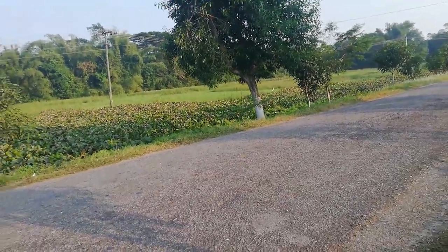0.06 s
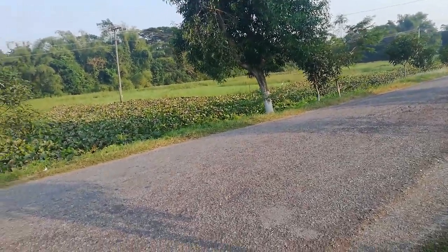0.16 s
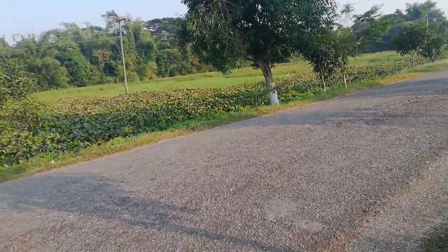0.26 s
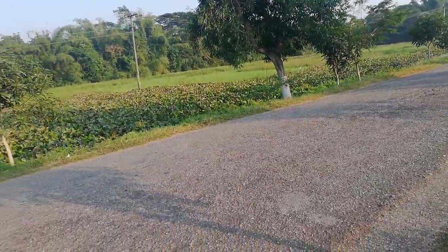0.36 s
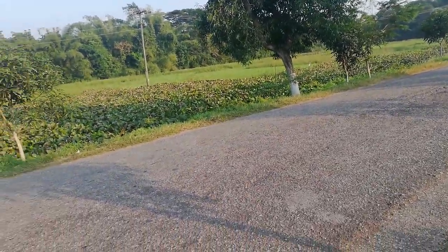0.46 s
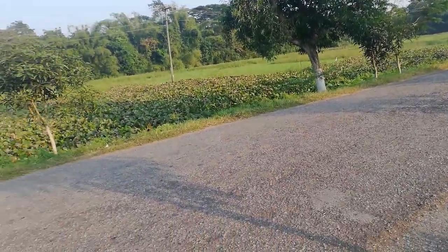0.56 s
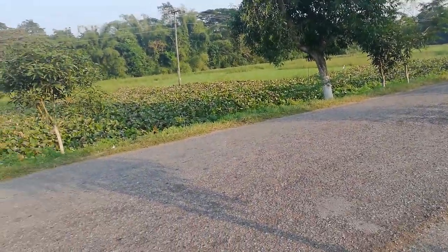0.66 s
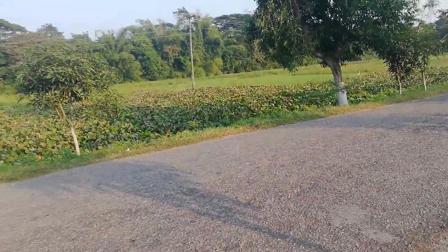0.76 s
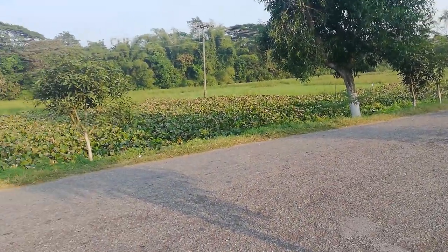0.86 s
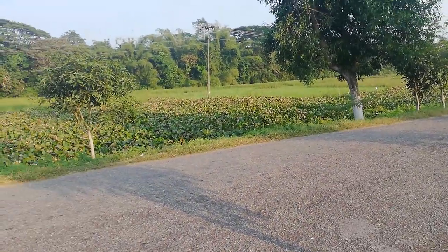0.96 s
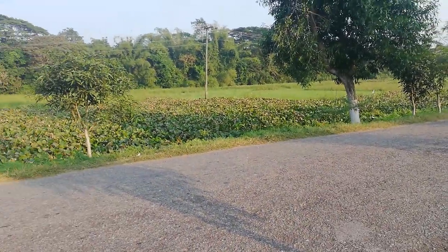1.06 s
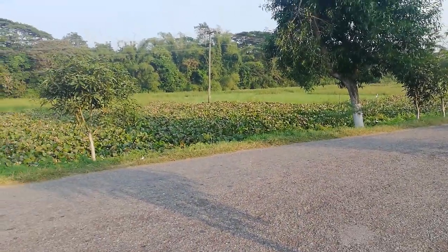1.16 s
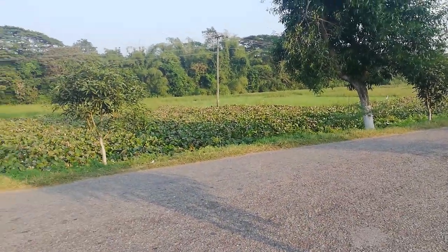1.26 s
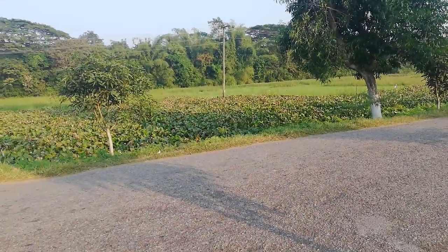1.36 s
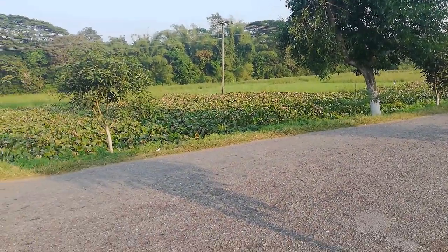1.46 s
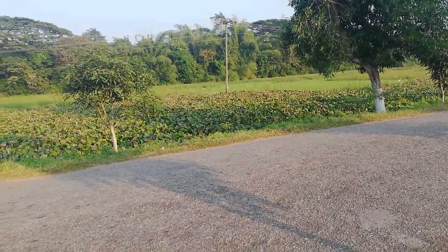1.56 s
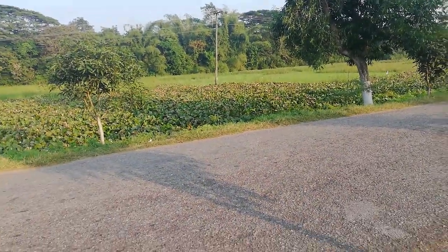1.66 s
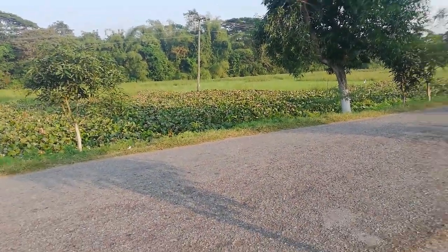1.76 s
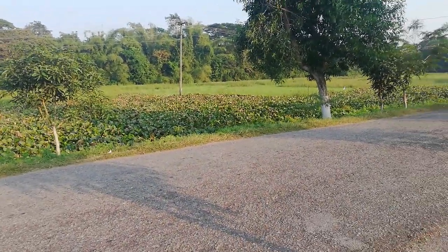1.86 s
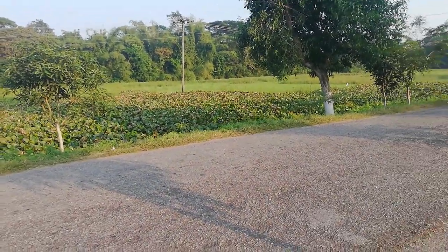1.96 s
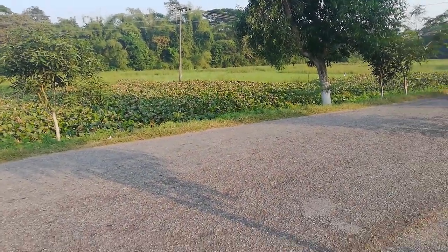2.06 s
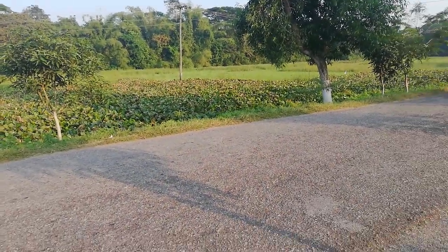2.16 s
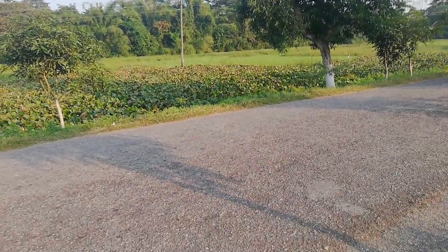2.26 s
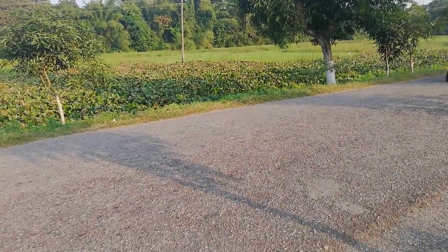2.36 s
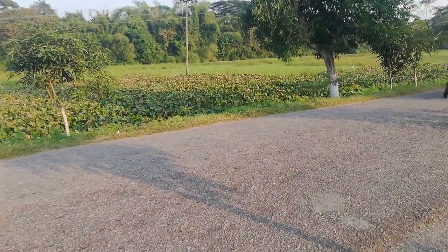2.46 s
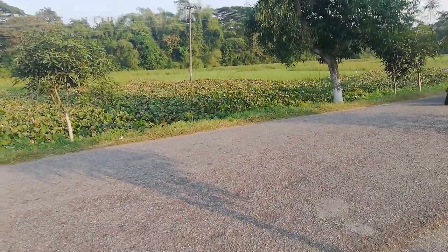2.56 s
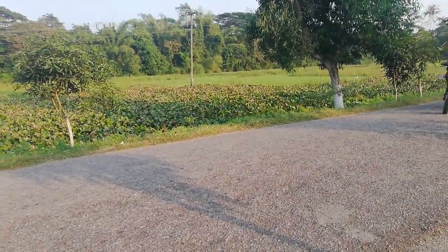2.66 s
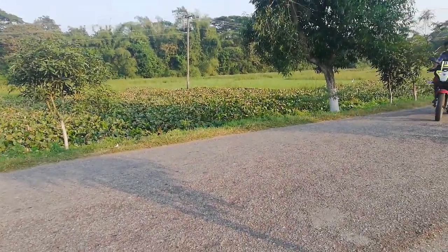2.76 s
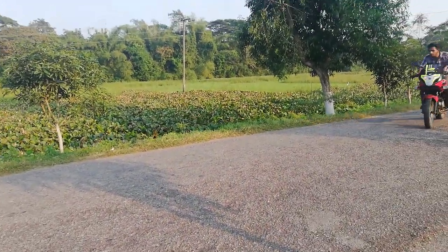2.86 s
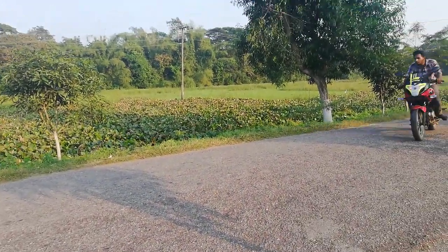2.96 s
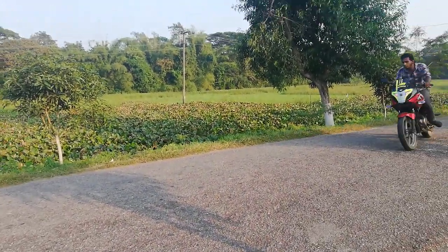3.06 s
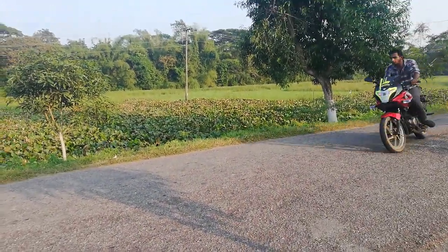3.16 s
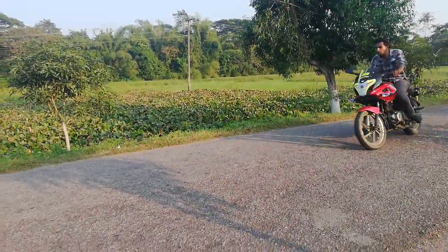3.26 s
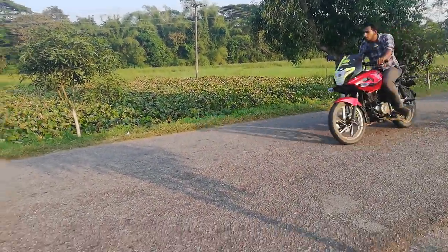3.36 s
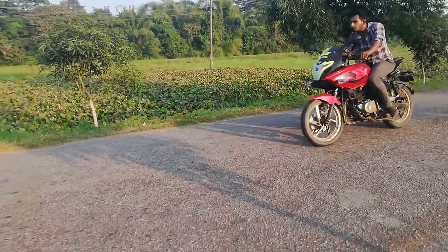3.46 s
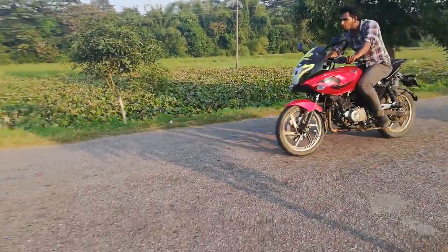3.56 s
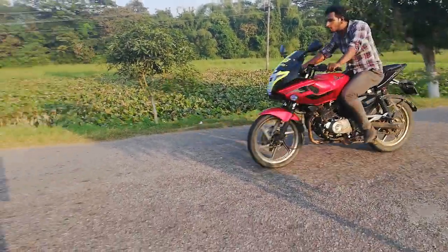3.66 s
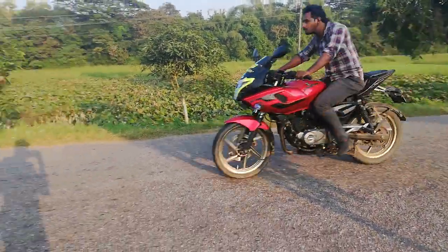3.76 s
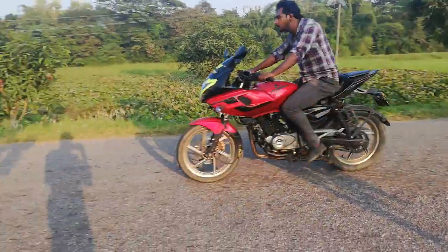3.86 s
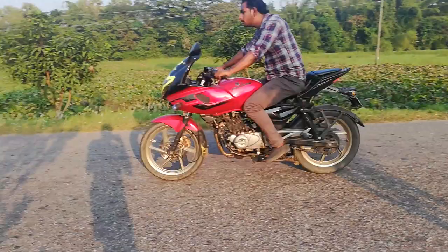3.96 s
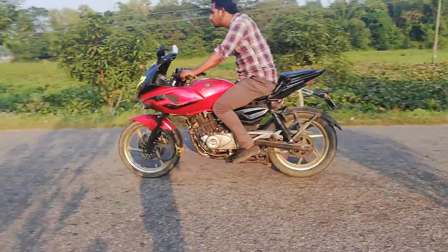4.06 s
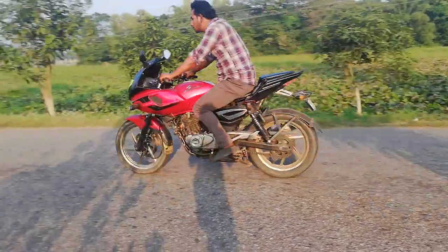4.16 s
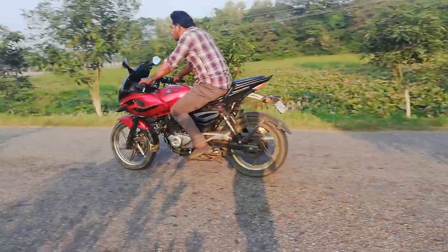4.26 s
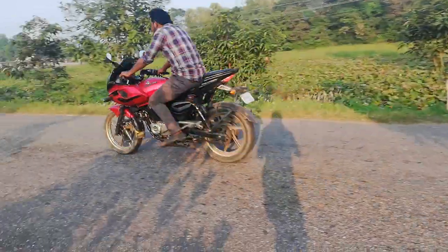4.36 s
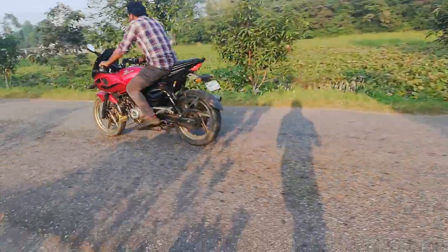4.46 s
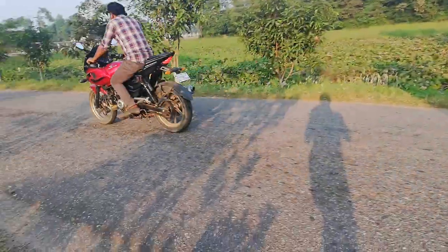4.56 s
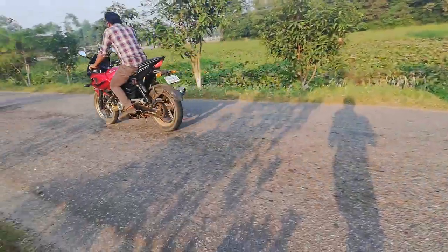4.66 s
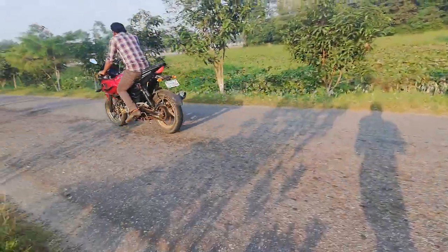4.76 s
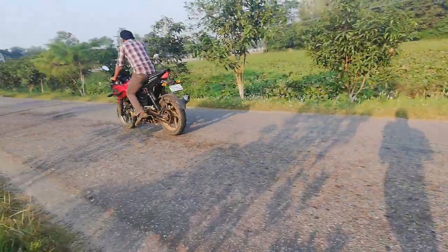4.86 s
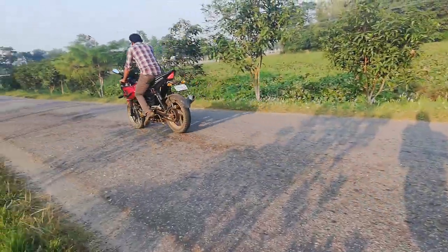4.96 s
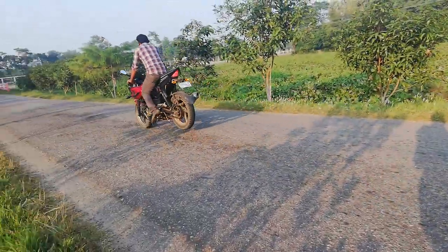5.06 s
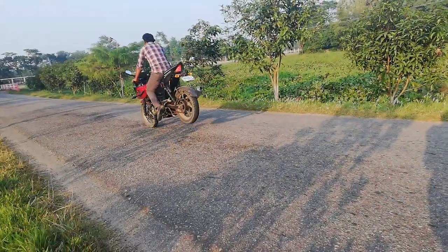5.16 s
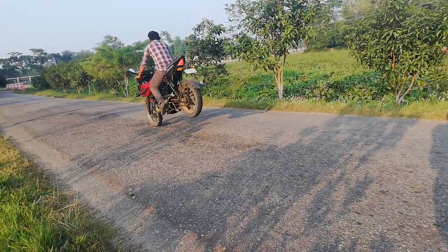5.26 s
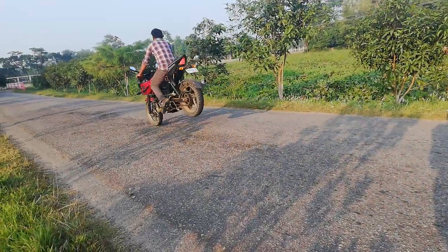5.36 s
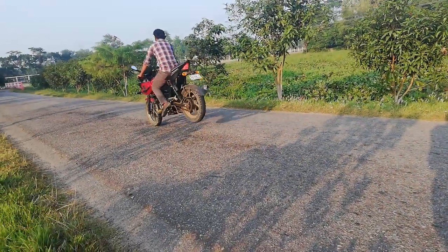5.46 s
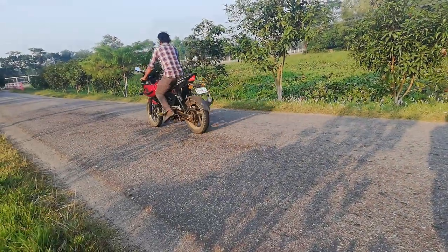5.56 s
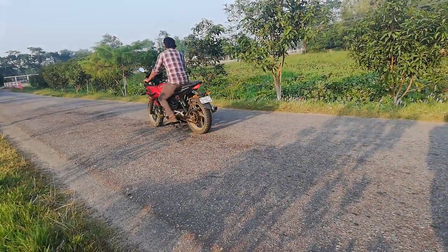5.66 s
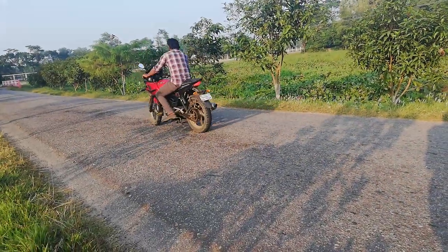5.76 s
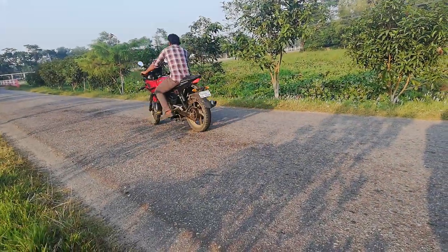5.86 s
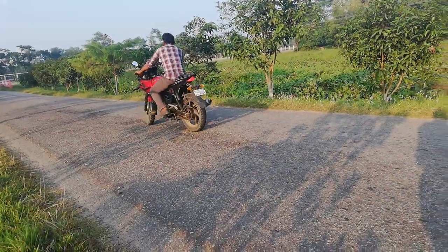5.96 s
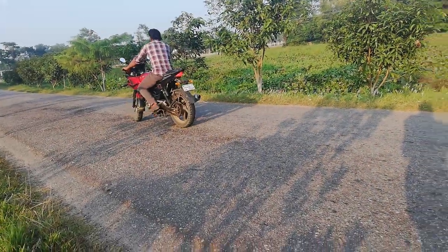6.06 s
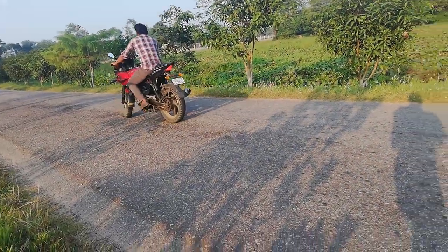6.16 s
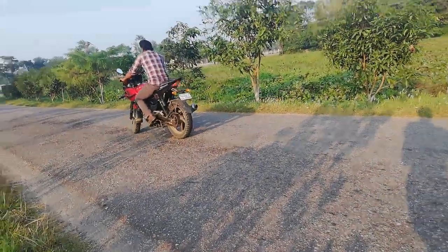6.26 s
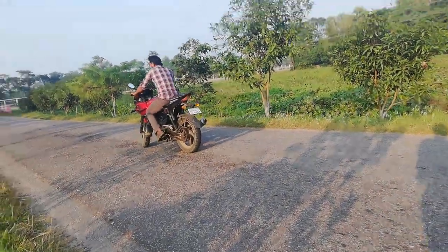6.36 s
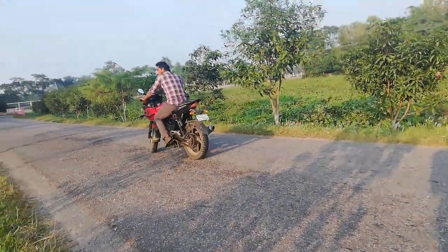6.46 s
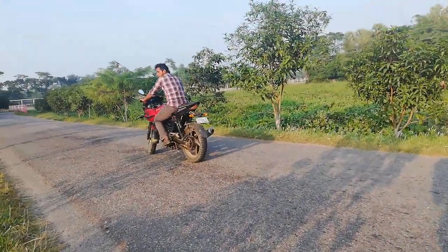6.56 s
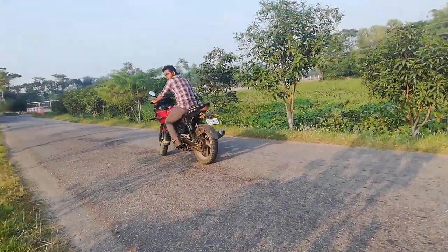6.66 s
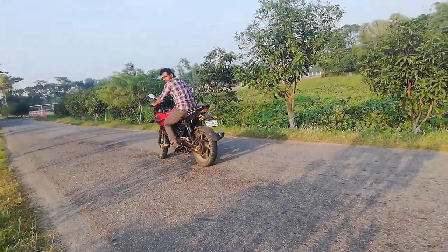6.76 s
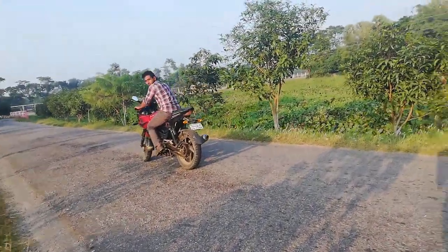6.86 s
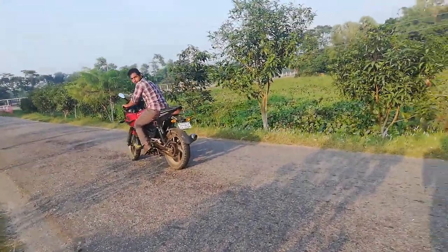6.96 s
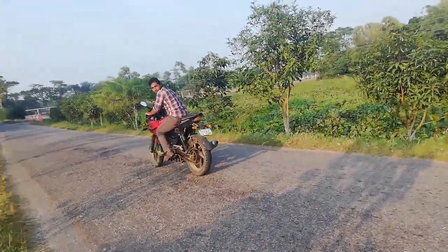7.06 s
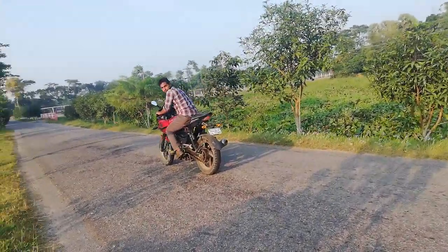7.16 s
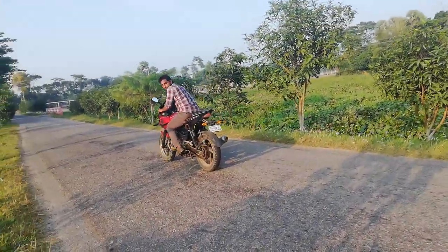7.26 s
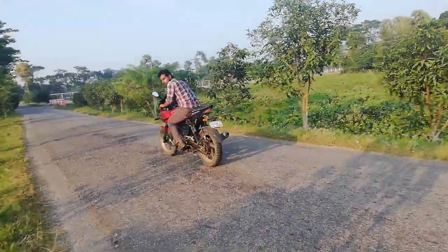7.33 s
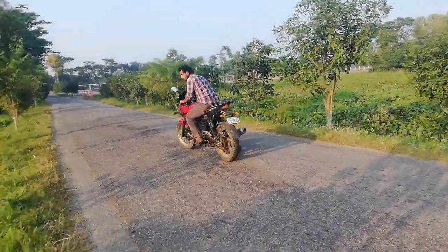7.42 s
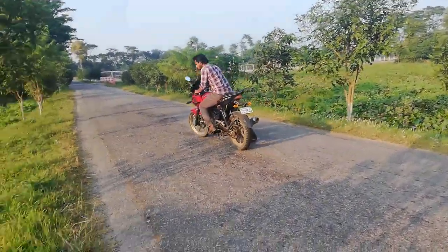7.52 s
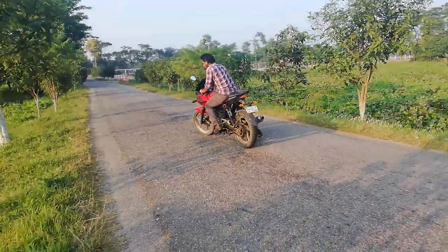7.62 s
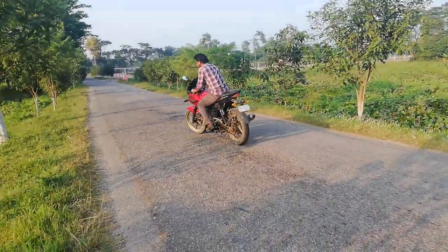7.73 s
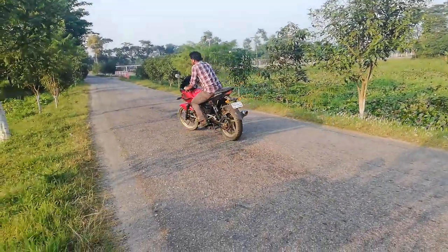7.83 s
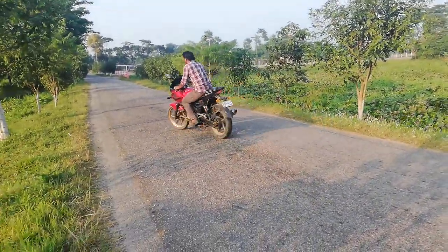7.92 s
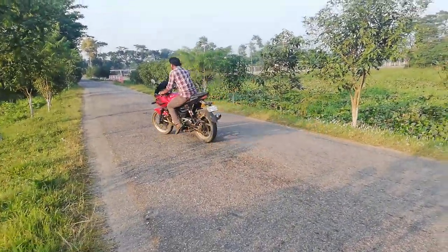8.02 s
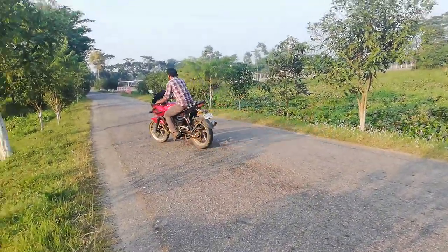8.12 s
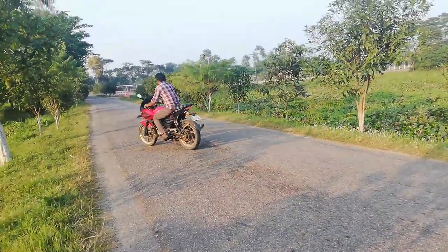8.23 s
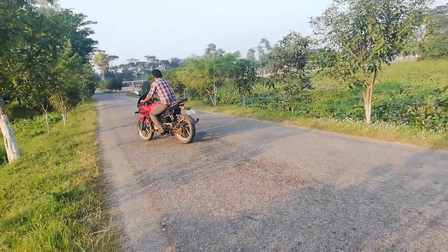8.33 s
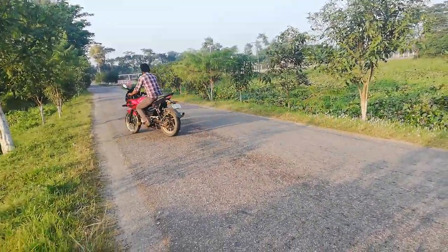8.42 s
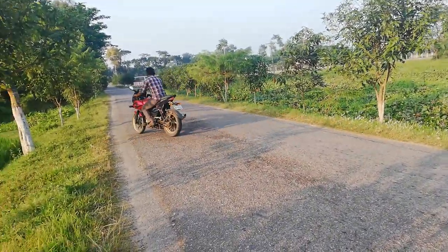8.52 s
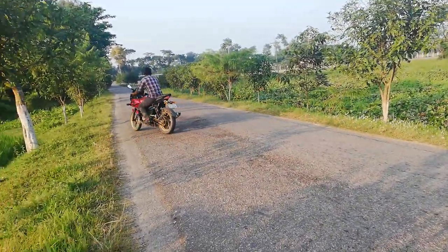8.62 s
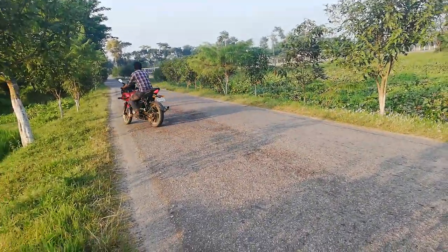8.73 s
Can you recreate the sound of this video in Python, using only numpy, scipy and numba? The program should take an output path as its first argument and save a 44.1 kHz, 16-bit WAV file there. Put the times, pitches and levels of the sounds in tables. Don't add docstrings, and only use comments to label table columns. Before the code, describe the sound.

Open country air, with low soft wind and a faint single-cylinder motorbike puttering at a distance; light ticks and a faint brush come early, a firmer tick at 0.7 s. Around 1.2-1.7 s the engine revs up briefly, with gear whine, then drops back. From 2.8 s it swells again, peaking near 3.5 s as it passes with throaty bark, metallic rattle and bright hiss. The throttle closes and the beat slows through 4-5 s into a sparse, stumbling idle until 6.5 s, some firings almost missing. Grit scuffs and pebble snaps dot this, heaviest around 5.7 s, with thin high insects behind. At 6.6 s it pulls off unevenly; a loud sharp tick hits near the left microphone at 7.04 s and a pebble snaps at 7.36 s. Harder, drier barks surge from 7.3 to 8.2 s, then the engine slows and recedes to 8.8 s.

```python
import sys
import numpy as np
from scipy import signal
from scipy.fft import rfft, irfft, next_fast_len
from scipy.io import wavfile
from scipy.ndimage import uniform_filter1d, map_coordinates
from numba import njit

SR = 44100
rng = np.random.default_rng(int(sys.argv[2]) if len(sys.argv) > 2 else 0)


def persist_wave(psi):
    counts = np.round(np.clip(psi, -1, 1) * 32767).astype(np.int16)
    wavfile.write(sys.argv[1], SR, np.atleast_2d(counts).T)


def ratio_of_db(decibels):
    return 10 ** (np.asarray(decibels, float) / 20)


N = 387638

# time in seconds, firings a second in Hz.
FIRING_RATE = [(0.0, 16.75), (0.907, 20.38), (1.625, 33.24), (2.089, 23.08), (2.467, 26.62), (2.963, 27.36),
               (3.43, 33.4), (4.081, 19.16), (4.827, 8.2), (5.814, 6.79), (6.529, 7.78), (6.644, 15.27),
               (6.928, 13.86), (7.22, 25.41), (7.727, 23.54), (7.95, 19.21), (8.24, 25.5), (8.79, 14.54)]
# time in seconds, open-throttle bark in dB, thump over bark in dB,
# airbox boom over bark in dB.
EFFORT = [(0, -52, 4, -27), (.55, -51, -13.5, -25), (0.948, -52, -20, -2), (1.25, -44.5, -6, 5),
          (1.6, -38.5, -7.5, -0.5), (2.0, -51.5, -8, -21), (2.8, -44, -10, -7), (2.95, -40, -5, 2),
          (3.498, -32.5, -12.5, -1.5), (3.8, -35, -11, -13), (4.2, -36, -13.5, -9), (4.5, -41, -17, -6),
          (5.1, -50.5, -8, -16), (6.4, -44.5, -18, -24), (6.62, -38, -2, -9), (6.85, -41.5, 2, -1),
          (7.0, -39, -3.5, -20), (7.3, -40.5, -9, -20), (7.57, -31, -23, -5), (7.8, -31.5, -17, -7),
          (8.15, -34, -8.5, -9), (8.79, -45, -10, -11)]
# start in seconds, end in seconds.
SHUT = [
    (.37, 0.5),
    (1.671, 1.84),
    (3.569, 6.55),
    (8.228, 18),
]
# time in seconds, change of bark in dB.
STUMBLES = [
    (4.88, -6),
    (4.99, 6.5),
    (5.27, -24),
    (5.4, -1),
    (5.53, -32),
    (5.67, -1),
    (6.11, -2),
    (6.51, -3),
    (6.76, -3.5),
    (6.88, -6),
]
# frequency in Hz, width in Hz, level in dB.
PIPE = [(310, 32, 6), (216.5, 8.9, 3)]
# frequency in Hz, width in Hz, level in dB.
SILENCER = [(80.5, 18.5, 0), (66.5, 34, 0)]
# frequency in Hz, width in Hz, level in dB.
AIRBOX = [(105.7, 35, 0)]
# delay in seconds, share.
PIPE_ECHOES = [(0, 0.52), (.0067, 0.087), (.0116, .19)]
# delay in seconds, share.
INTAKE_ECHOES = [(0, 0.82), (.009, 0.57)]
ORDERS = [(2, .72, 0.4, 0.53, 2.3), (3, -0.77, -0.79, -.8, -1.5), (4, 0.72, 1, .82, 0.16),
          (5, -0.26, 0.12, -0.27, 0.78), (6, 0.066, .6, 0.076, 0.18), (7, 0.051, 0.2, 0.15, 0.031),
          (8, 0.013, 0.62, -0.28, -0.14), (9, 0.33, 0.032, 0.48, 0.39), (10, 0.32, -0.33, 0.55, -0.56),
          (11, 0.41, -0.054, 0.93, -0.025), (12, -0.053, .8, 1, 0.5), (13, 0.19, 0.69, .9, -.2)]
STAGES = [1.8, 2.0, 2.8, 3.1, 4.5, 5.1]
# time in seconds, rattle in dB, gear whine over rattle in dB.
WORKS = [(0, -50, 8), (1.15, -47.5, 6), (1.74, -43, -6.5), (2.13, -43.5, -0.5), (2.89, -41, -2.5),
         (3.13, -39, 4), (3.5, -31.5, -3), (3.87, -35.5, 3.5), (4.43, -39.5, -8), (5.14, -49, -15),
         (6.29, -48, -33), (6.7, -43, -46), (7.02, -42, -10), (7.3, -36, -10), (7.56, -37.5, -4.5),
         (8.03, -42, -1), (8.2, -39.5, -9), (8.79, -47.5, -39)]
# frequency in Hz, density in dB per Hz.
RATTLE = [(130, -55), (220, -1.5), (380, -4), (505, -17), (615, -44), (694, -11.5), (845, -4.5), (932, 1),
          (1760, -6), (2240, -4), (2700, -1), (3540, -2.5), (4760, -20), (5200, -131), (6760, -37),
          (11400, -120)]
# frequency in Hz, density in dB per Hz.
HISS = [(2710, -5), (4200, -2), (4800, -5.5), (5400, -2.5), (6000, -1.5), (6630, 2), (7320, -1.5),
        (8690, -0.5), (9950, -7), (11600, -10.5), (12600, -19), (15200, -18), (16000, -40)]
# teeth per firing, width in the same unit, level in dB.
GEARS = [(75.3, 6.8, 0)]
# teeth per firing, width in the same unit, level in dB.
CHAIN = [(114, 4.4, -0.098), (172, 17, -0.9)]
# start in seconds, end in seconds, first frequency in Hz, last frequency in Hz, level over rattle in dB.
SHEEN = [(-.2, .55, 1170, 1400, 5), (-.1, .92, 2000, 2180, 2), (.9, 1.2, 2550, 2720, -2),
         (.9, 1.28, 4650, 5050, 1), (1.15, 1.6, 5250, 5650, -7), (1.4, 1.7, 1050, 1120, 3),
         (5.9, 6.05, 5100, 4950, -4), (1.42, 1.7, 520, 570, -9), (7.4, 8.3, 800, 740, -8),
         (7.0, 7.55, 3650, 3550, -12), (7.05, 7.4, 4500, 4350, -13), (7.95, 8.25, 3350, 3600, -11),
         (6.4, 7.2, 2200, 2250, -9), (8.02, 8.32, 1820, 1950, -3), (1.46, 1.78, 3600, 3950, -1),
         (3.3, 3.8, 1500, 2050, -1), (3.1, 4.0, 1150, 1280, -4), (1.95, 2.9, 2750, 2950, -5),
         (1.75, 2.9, 4400, 4350, -6), (3.05, 3.6, 3250, 3500, -5), (3.62, 4.15, 2000, 1400, -4),
         (3.95, 4.9, 1250, 1080, -6), (3.3, 3.65, 3550, 3800, -3), (3.6, 4.05, 3100, 2400, -6),
         (4.0, 4.4, 2150, 1850, -6), (4.0, 4.45, 3050, 3150, -9), (6.6, 7.1, 3100, 3250, -12),
         (3.28, 3.68, 2650, 2900, -4), (1.58, 2.05, 5050, 4400, -3), (1.42, 1.8, 2530, 2600, 0),
         (2.7, 3.3, 1100, 1200, -6), (8.2, 8.8, 2550, 2450, -5), (7.15, 7.7, 1950, 1800, -5),
         (7.1, 7.45, 900, 980, -5), (7.1, 7.6, 6400, 6450, -8), (1.38, 1.6, 4450, 4350, -9),
         (2.2, 2.5, 5500, 5600, -9), (6.4, 6.9, 5400, 5600, -11)]
# time in seconds, share of the centre frequency.
SHEEN_WIDTH = [(3.0, .065), (3.5, .095), (4.3, .075), (6, .065)]
# frequency in Hz, width in Hz, level in dB.
SPIT = [(2450, 200, 5), (3200, 270, -9), (6200, 540, 6), (11800, 1200, -6)]
# time in seconds, frequency in Hz,
# depth from 0 to 1.
DIP = [(0, 4320, 0), (.6, 4540, 0.2), (1.001, 5670, 0.5), (1.25, 6000, 0.3), (1.6, 5900, .3),
       (1.951, 5100, 0.65), (2.6, 5000, 0.37), (3.6, 5200, 0.2), (4.6, 5000, 0.54), (5.2, 5450, 0.8),
       (6.2, 5340, 0.8), (6.55, 4700, 0.2), (7.0, 4940, 0), (7.3, 5240, 0.2), (7.8, 5340, 0.84),
       (8.79, 5200, 0.01)]
# time in seconds, frequency in Hz, depth from 0 to 1.
LOW_DIP = [(0, 3000, .4), (.7, 3100, 0.7), (1.3, 3300, 0.8), (2.0, 3450, 0.9), (2.8, 3400, 0.6),
           (2.95, 2600, .5), (3.55, 2240, 0.36), (3.85, 2330, 0.4), (4.1, 2520, 0.2), (4.3, 3700, 0.5),
           (4.6, 3770, 0.34), (6.4, 2800, 0), (7.2, 2786, 0), (7.7, 2140, 0), (8.79, 3020, 0)]
# frequency in Hz, density in dB per Hz.
FIELD = [(15, -37), (25, -5), (97, 2.5), (157, -5.5), (317, -10), (591, -26), (754, -4.5), (1840, -44),
         (2220, -9), (5430, -58), (6560, -11), (9570, -20.5), (10400, -17), (12200, -50), (16000, -49)]
# frequency in Hz, width in Hz, level in dB, start in seconds, end in seconds, trill depth.
INSECTS = [
    (6340, 77, -62, 3.2, 10, .1),
    (10290, 45, -57, 4.3, 6.3, 1.1),
]
# time in seconds, peak
# in dB, treble over peak in dB, knock over peak in dB.
SCUFFS = [(4.2512, -45.5, 10, -20), (4.36, -48, 8, -20), (4.398, -26.5, -13, -20), (4.479, -51, 10, -20),
          (4.648, -51, 10, -20), (4.733, -47, 6, -20), (4.774, -53, 8, -20), (4.852, -52, 9, -20),
          (4.904, -53, 8, -20), (4.97, -38, 1, -18), (4.991, -34, -3.5, -11), (5.004, -34.5, -7, -9),
          (5.047, -56, 7, -10), (5.069, -56, -1, -10), (5.335, -31, -20, -19), (5.643, -31.5, -37, 12.5),
          (5.654, -32, -6, -8), (5.672, -22, -10.5, -1), (5.686, -23.5, -10.5, -1), (5.697, -29, -17, 2),
          (5.715, -35, -17, 8), (5.7304, -18, -14.5, -23), (5.745, -26, -12, -15), (5.7736, -24.5, -15, -6),
          (5.788, -31, -11, -3), (5.828, -40, -23, 7), (5.921, -50.5, 4.5, -20), (5.959, -39, -16, -1),
          (6.334, -43.5, 7.5, -20), (6.590, -34, -5, -20), (6.61, -35, -7, 2), (6.662, -31.5, -6, -9),
          (6.731, -33.5, -10, -6), (6.815, -41, -3, -6), (6.935, -40, -7, -20), (6.951, -42, 3.5, -18),
          (7.004, -28, -8, -26), (7.058, -41, 6, -25), (7.136, -40, 9, -20), (7.3165, -44, 8, -20),
          (7.363, -28, -22, -30), (8.721, -49, 4, -12)]
# start in seconds, end in seconds, level in dB, treble over it in dB.
DRAGS = [
    (0.123, 0.233, -64.5, 16.5),
    (0.265, 0.464, -56.5, 11),
    (6.335, 6.39, -50.5, 10),
]
# frequency in Hz, density in dB per Hz.
GRIT = [(71, -40), (120, -8), (264, -1.5), (419, -8), (588, -44), (1070, 5.5), (1510, -10.5), (1790, -1),
        (2020, -5.5), (3120, -6), (4800, -37), (6240, -48), (10600, -120)]
# frequency in Hz, width in Hz, level in dB.
SOLE = [(196, 43, 1), (423, 71, 2), (690, 210, -8), (960, 210, 4), (1790, 77, -23), (2940, 310, -24)]
# time in seconds, peak in dB, upper ring in dB, upper ring in Hz, chatter in dB.
TICKS = [
    (0.181, -42, -20, 14000, 0),
    (0.196, -38.5, -13, 14000, -3),
    (0.677, -27, -22, 15300, 1),
    (3.6254, -29, -9, 13500, -1),
    (4.1357, -36, -22, 13900, -3),
    (6.789, -37.5, -20, 14000, -2),
    (7.0426, -15, -16, 13800, 0),
    (7.1847, -34, -21, 14000, -4),
    (7.279, -30.5, -11, 14100, -12),
    (7.4436, -35, 2, 12400, -3),
]
# delay in seconds, level in dB, length in seconds.
BOUNCES = [
    (0, 0.5, 0.0038),
    (.0024, -4.5, 0.0034),
    (.0054, -10, 0.0017),
    (.0070, -11, .003),
    (.0088, -7.5, 0.0052),
]
# time in seconds, peak in dB, ring in Hz, width in Hz.
PEBBLES = [
    (4.401, -33, 2300, 700),
    (4.970, -30, 5000, 7000),
    (5.338, -33, 2000, 600),
    (5.673, -24, 2500, 4000),
    (7.363, -17, 2000, 3000),
]
# time in seconds, delay in samples.
BEARING = [(0, -15), (.85, -16), (.9, 25), (3.05, 25), (3.2, 27), (3.82, 27), (3.85, 0), (8.79, 1)]
# frequency in Hz, loss in dB.
RIGHT_LOSS = [(60, -.2), (110, -.2), (200, -.3), (380, 1.5), (700, -.8), (1290, 5.3), (2380, 9.5),
              (4400, 9.5), (8120, 22.5), (15000, 9)]


def level(x, db):
    return x * ratio_of_db(db) / np.sqrt(np.mean(x ** 2))


def curve(s, values):
    return np.interp(np.arange(N) / SR, s, values)


def swell(start, end):
    return np.sin(np.pi * curve([start, end], [0, 1])) ** 2


def colour(x, points):
    hz, db = np.transpose(points)
    size = next_fast_len(N)
    axis = np.log(np.arange(size // 2 + 1) * SR / size + 1)
    gain = ratio_of_db(np.interp(axis, np.log(hz), db))
    return irfft(rfft(x, size) * gain, size)[..., :N]


@njit
def svf(x, hz, width):
    y, band, low = np.empty(len(x)), 0., 0.
    for i in range(len(x)):
        g = np.tan(np.pi * hz[i] / SR)
        k = width[i] / hz[i]
        v = (band + g * (x[i] - low)) / (1 + g * (g + k))
        band, low = 2 * v - band, low + 2 * g * v
        y[i] = k * v
    return y


def ring(x, modes, scale=1):
    scale = np.ones(N) * scale
    return sum(ratio_of_db(db) * svf(x, hz * scale, width * scale) for hz, width, db in modes)


def noise():
    return rng.standard_normal(N)


def walk(rate):
    hold = int(SR / rate)
    steps = np.repeat(rng.standard_normal(N // hold + 1), hold)
    return 1.3 * uniform_filter1d(uniform_filter1d(steps, hold), hold)[:N]


def pair(alike):
    shared, left, right = rng.standard_normal((3, N))
    return np.sqrt(alike) * shared + np.sqrt(1 - alike) * np.array([left, right])


def effort():
    s, bark_db, thump_db, boom_db = np.transpose(EFFORT)
    ramp_s, choke_s = 0.022, 0.065
    shut = sum(curve([a, a + ramp_s, b, b + ramp_s], [0, 1, 1, 0]) for a, b in SHUT)
    choke = sum(swell(a - choke_s, a + 1.2 * choke_s) for a, b in SHUT[1:])
    stumble_db = sum(db * swell(at - .09, at + 0.078) for at, db in STUMBLES)
    open_db = curve(s, bark_db) + stumble_db
    thump_db = open_db + curve(s, thump_db) + 13.5 * shut - 13.5 * choke
    return shut, open_db, thump_db, open_db + curve(s, boom_db)


def puffs(turns, turn, lead_s, sharp_hz, echoes):
    fired = np.diff(np.floor(turns - turn), prepend=0).clip(0)
    fired = sum(share * np.roll(fired, int((after - lead_s) * SR)) for after, share in echoes)
    u = (np.pi * sharp_hz * np.arange(-500, 501) / SR) ** 2
    return signal.fftconvolve(fired, (2 * u - 1) * np.exp(-u), "same")


def silencer_thump(turns):
    fired = np.roll(np.diff(np.floor(turns), prepend=0).clip(0), -int(.0137 * SR))
    pulse = np.exp(-(np.pi * 250 * np.arange(-200, 201) / SR) ** 2)
    push = signal.fftconvolve(fired, pulse, "same")
    return -ring(ring(push, SILENCER[:1]), SILENCER[1:])


def exhaust(hz, turns):
    shut, open_db, thump_db, boom_db = effort()
    bark = puffs(turns, 0, .0007, 146.4, PIPE_ECHOES)
    bark = bark + ring(bark, PIPE)
    gulp = puffs(turns, .57, .0007, 141, INTAKE_ECHOES)
    boom = -ring(puffs(turns, .5, .0028, 108, [(0.0022, 1)]), AIRBOX)
    bark_db = open_db - 7 * shut + 0.1 * np.minimum(hz - 13, 0)
    gulp_db = open_db - 11.5 - 4.5 * shut + 1.07 * (hz - 25)
    layers = ((bark, bark_db), (silencer_thump(turns), thump_db), (gulp, gulp_db), (boom, boom_db - 4.5 * shut))
    scatter = ratio_of_db(rng.standard_normal((400, 4))[(turns + .3).astype(int)].T)
    out = sum(level(x, db) * scatter[k] for k, (x, db) in enumerate(layers))
    flow = [(140, 200, 0)]
    gas = level(ring(ring(noise(), flow), flow), -28) * ratio_of_db(open_db)
    orders = 0
    for order, *shares in ORDERS:
        share = curve(STAGES, np.repeat(shares, 2)[1:-1])
        orders = orders + share * svf(out, order * hz, 0.44 * hz)
    return out + gas + (1 - shut) * orders


def loose_rattle(rattle_db, beat):
    shaken = pair(0.36) * (1 + 0.67 * beat) * ratio_of_db(2.0 * walk(25))
    rattle = level(colour(shaken, RATTLE), 0.56)
    dull = colour(rattle, [(2300, -3), (3000, -57)])
    return dull + ratio_of_db(np.minimum(0.63 * (rattle_db + 36.0), 0)) * (rattle - dull)


def hiss_and_sizzle(hz, hiss_db, beat):
    sparks = pair(0.18) * ratio_of_db(1.9 * rng.exponential(size=N).clip(max=np.pi * 2))
    hiss = level(colour(sparks * (1 + 0.69 * beat) * ratio_of_db(walk(15)), HISS), 3.1)
    sizzle = sparks * (1 + 0.94 * beat) * ratio_of_db(3.2 * walk(70) + 2.0 * walk(200))
    sizzle = level(colour(sizzle, [(9500, -44), (11500, 15), (13500, 11), (16000, -10.0)]), -9.5)
    far_db = -9.5 + 3 * np.minimum(hz - 17, 0)
    return ratio_of_db(hiss_db) * (hiss + np.hypot(ratio_of_db(1.4 * (hiss_db + 37.5)), ratio_of_db(far_db)) * sizzle)


def gear_whine(hz):
    whine = level(ring(noise(), GEARS, hz) * ratio_of_db(np.pi * walk(30)), 0)
    return whine * curve([.78, .95, 1.15, 1.32, 1.42], [.2, .65, .9, 1.3, .6])


def chain_and_sheen(hz):
    out = np.sqrt(swell(1.3, 3.3)) * level(ring(noise(), CHAIN, hz), -21)
    for start, end, first_hz, last_hz, db in SHEEN:
        width = np.interp(start / 2 + end / 2, *np.transpose(SHEEN_WIDTH))
        band = ring(noise(), [(0.99, width, 0)], curve([start, end], [first_hz, last_hz]))
        out = out + swell(start, end) ** 0.4 * level(band, db + 1) * ratio_of_db(1.5 * walk(40))
    return out


def firing_crack(hz, turns, since):
    blow = (turns + .19) % 1 / hz / .0045
    strike = np.roll(np.diff(since, prepend=0) < 0, int(.0015 * SR))
    snap = blow * np.exp(1 - blow) * noise() + 17 * strike
    shell = ring(ring(snap, [(1300, 1100, 0)]), [(1310, 1100, 0)])
    shell = ring(shell, [(798, 220, 2.5), (1244, 360, -3.5), (1760, 310, -1.0), (3200, 1350, 4)])
    return level(shell, 0) + level(ring(snap, SPIT), -11)


def road_dips(out):
    for dip, width in ((DIP, .16), (LOW_DIP, .2)):
        s, dip_hz, depth = np.transpose(dip)
        bands = np.array([ring(port, [(0.97, width, 0)], curve(s, dip_hz)) for port in out])
        out = out - curve(s, depth.clip(0, 1)) * bands
    return out


def machinery(hz, turns):
    s, *columns = np.transpose(WORKS)
    rattle_db, whine_db = (curve(s, c) for c in columns)
    hiss_db = rattle_db - 2.5 + 0.25 * np.minimum(hz - 15, 0)
    shut, open_db, *_ = effort()
    facing_db = curve([4.5, 5.0], [-12, -8.5])
    crack_db = open_db - 27.5 * shut + facing_db - rattle_db
    since = (turns + .08) % 1 / hz
    beat = np.exp(-since / 0.0077) * curve([7.2, 7.5, 8.2, 8.3], [1, 1.67, 1.67, 1])
    body = loose_rattle(rattle_db, beat) + ratio_of_db(whine_db) * gear_whine(hz)
    body = body + chain_and_sheen(hz) * (0.98 + 0.15 * beat)
    body = body + ratio_of_db(crack_db) * firing_crack(hz, turns, since)
    return road_dips(ratio_of_db(rattle_db) * body + hiss_and_sizzle(hz, hiss_db, beat))


def field():
    out = level(colour(pair(0.49), FIELD), -49) * ratio_of_db(walk(0.63))
    wind = level(ring(noise(), [(38.4, 24, 0)]) * ratio_of_db(1.7 * walk(5.05)), -53.5)
    gusts_db = curve([0, 1.7, 3.5, 4.3, 5.2, 6.8, 7.3, 8.8], [-7, -2, 4, 9, -2.5, 5, 4, 4])
    out = out + wind * ratio_of_db(gusts_db)
    for hz, width, db, start, end, depth in INSECTS:
        on = curve([start - .1, start, end, end + 0.34], [0, 1, 1, 0])
        chirp = np.exp(depth * np.cos(2 * np.pi * 152.6 * np.arange(N) / SR))
        tone = np.sin(2 * np.pi * np.cumsum(hz + width * walk(300)) / SR)
        out = out + level(tone * chirp, db) * on * ratio_of_db(1.7 * walk(40))
    return out


def shoe():
    grains = pair(0.67) * ratio_of_db(4.0 * walk(400))
    body, top, knocks = np.zeros((3, N))
    t = np.arange(int(.3 * SR)) / SR
    slide = np.exp(-(t / 0.014) ** 1.02) + 0.071 * np.exp(-t / 0.069)
    for s, db, treble_db, knock_db in SCUFFS:
        i = int(s * SR)
        body[i:i + len(t)] += ratio_of_db(db - 8.5) * slide[:N - i]
        top[i:i + len(t)] += ratio_of_db(db + treble_db + 2.0) * slide[:N - i]
        knocks[i - int(.002 * SR)] -= ratio_of_db(db + knock_db + 28.5)
    for start, end, db, treble_db in DRAGS:
        drag = swell(start, end) ** .5
        body += ratio_of_db(db) * drag
        top += ratio_of_db(db + treble_db) * drag
    crunch = level(colour(grains, GRIT), 0) * body + level(colour(grains, HISS), 0) * top
    heel = np.convolve(knocks, np.hanning(int(0.00093 * SR)) / 16, "same")
    return crunch + ring(heel, SOLE)


def ticks():
    out = np.zeros(N)
    for s, db, upper_db, upper_hz, chatter_db in TICKS:
        for after, bounce_db, length in BOUNCES:
            t = np.arange(int(length * SR)) / SR
            phase = np.outer([8940, upper_hz, 15600], t) + rng.random((3, 1))
            low, high, top = np.sin(2 * np.pi * phase)
            rings = low + ratio_of_db(upper_db) * (high + ratio_of_db(-9) * top)
            shape = np.sin(np.pi * (t / length) ** 0.42) ** 2
            gain = ratio_of_db(db + bounce_db + chatter_db * (after > 0) + 9.5)
            i = int((s + after - .0006) * SR)
            out[i:i + len(t)] += gain * shape * rings
    return out * ratio_of_db([[0], [-8]])


def pebbles():
    out = np.zeros(N)
    for s, db, hz, width in PEBBLES:
        snap = -1. * (np.arange(N) == int(s * SR))
        out += ring(snap, [(hz, width, db)]) * SR / (2 * np.pi * width)
    return out


def scene():
    hz = uniform_filter1d(curve(*np.transpose(FIRING_RATE)), int(.1 * SR), mode="nearest")
    hz = hz + 2.2 * (swell(.04, .16) - swell(.16, .28))
    turns = .093 + np.cumsum(hz) / SR
    dry = exhaust(hz, turns) + machinery(hz, turns) + field() + shoe() + ticks() + pebbles()
    return dry + colour(dry[0] - dry, [(550, 0), (1500, -20)])


def roll_off(x):
    return signal.sosfilt(signal.butter(12, 16590, fs=SR, output="sos"), x)


def record(dry):
    left, right = dry
    bass = colour(right, [(500, 0), (800, -4.5), (1300, -20)])
    late = np.arange(N) - curve(*np.transpose(BEARING))
    right = np.roll(bass, 24) + map_coordinates(right - bass, [late], order=3)
    right = colour(right, np.array(RIGHT_LOSS) * [1, -1])
    top_hz = 15850
    mix = colour(np.array([left, right]), [(top_hz, 0), (top_hz * 1.03, -60)])
    return roll_off(mix)


dry = scene()
out = record(dry)
persist_wave(out)
```